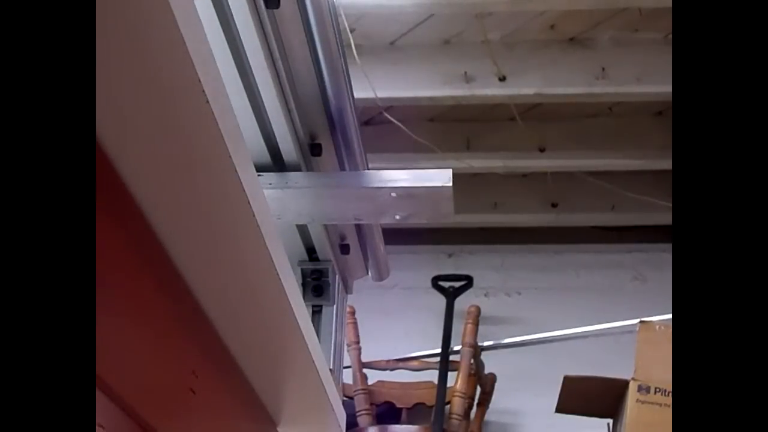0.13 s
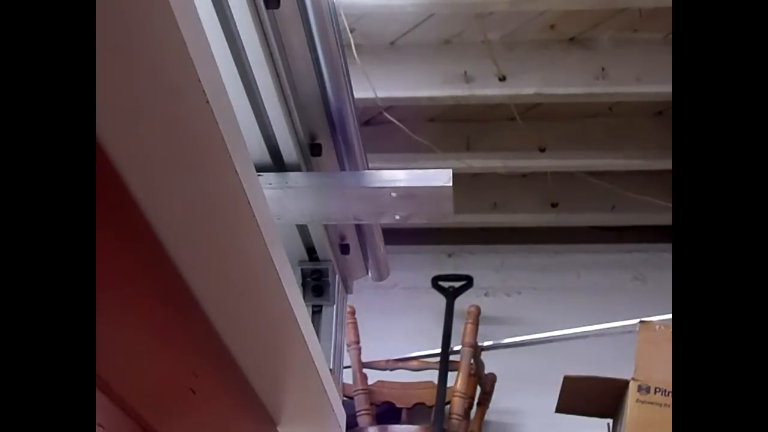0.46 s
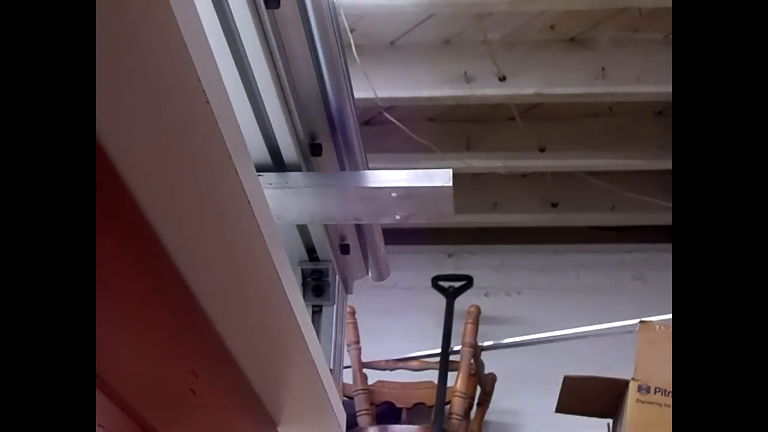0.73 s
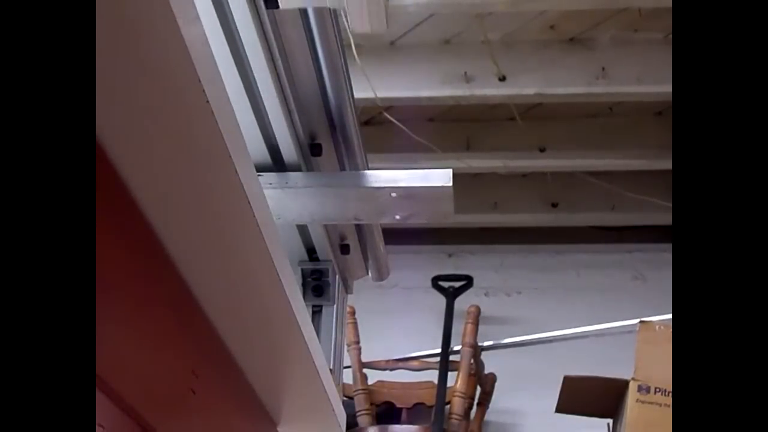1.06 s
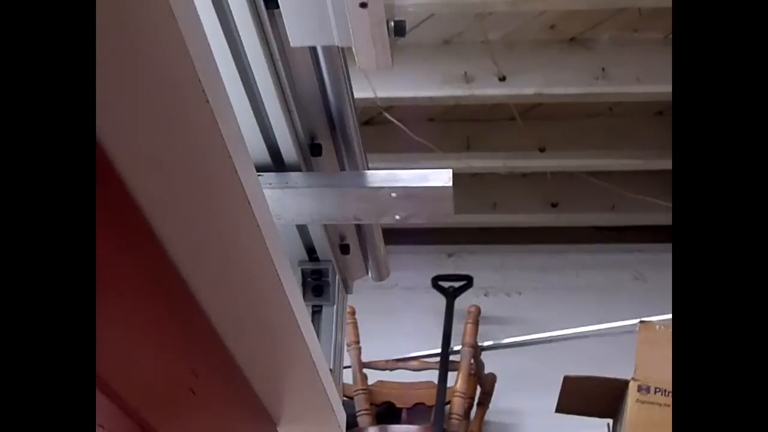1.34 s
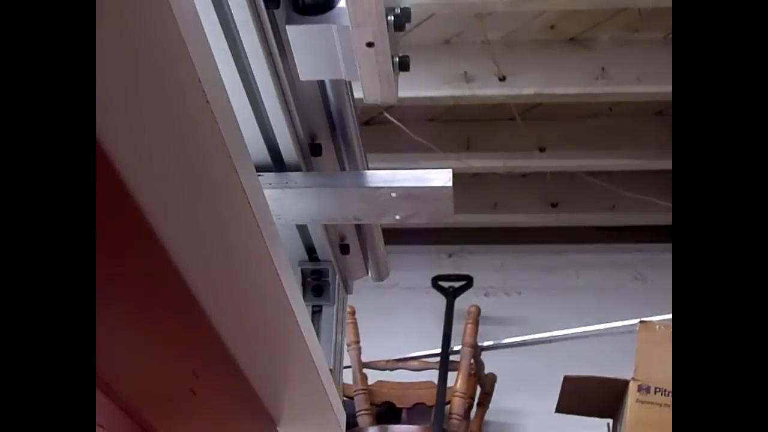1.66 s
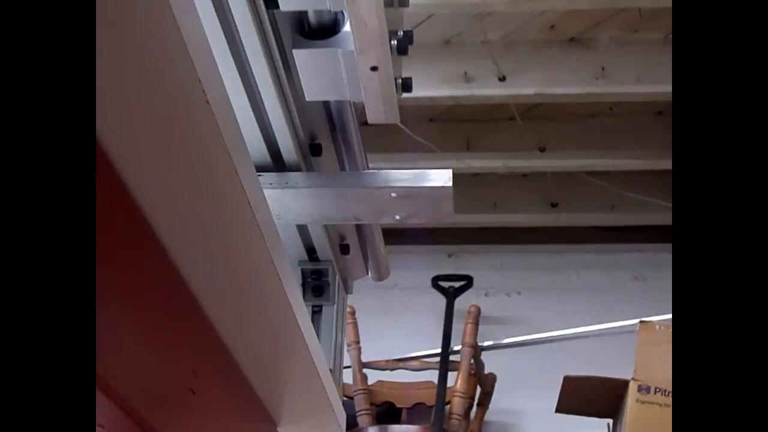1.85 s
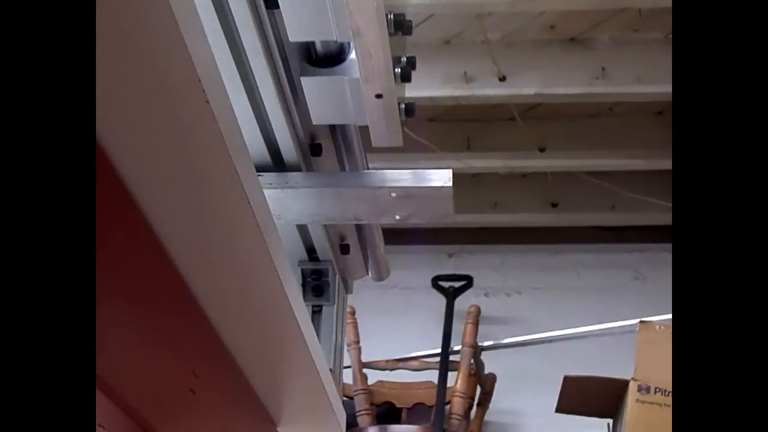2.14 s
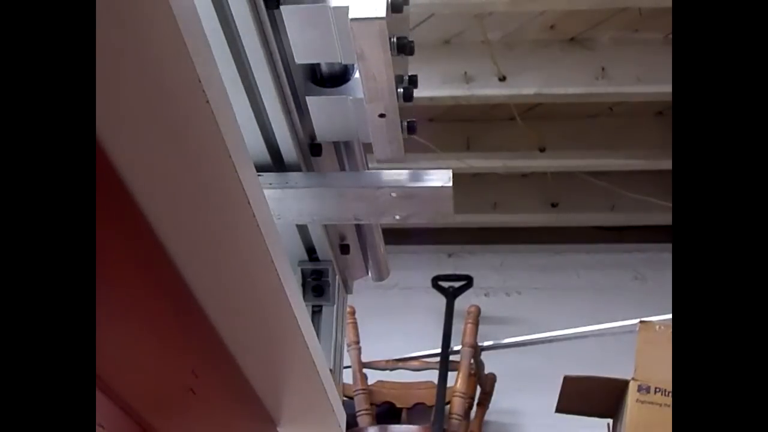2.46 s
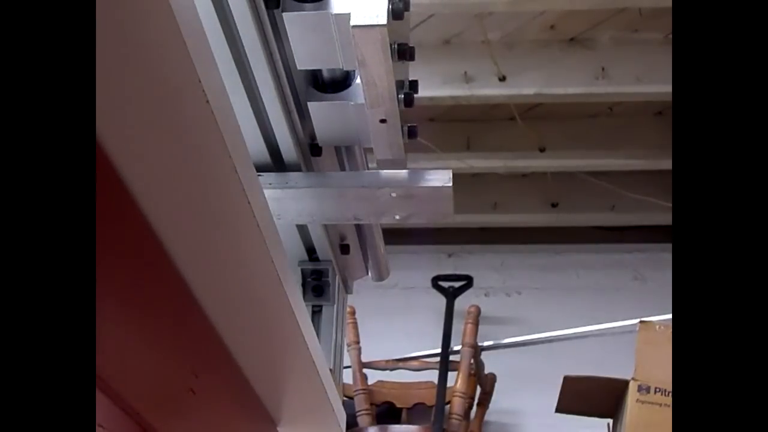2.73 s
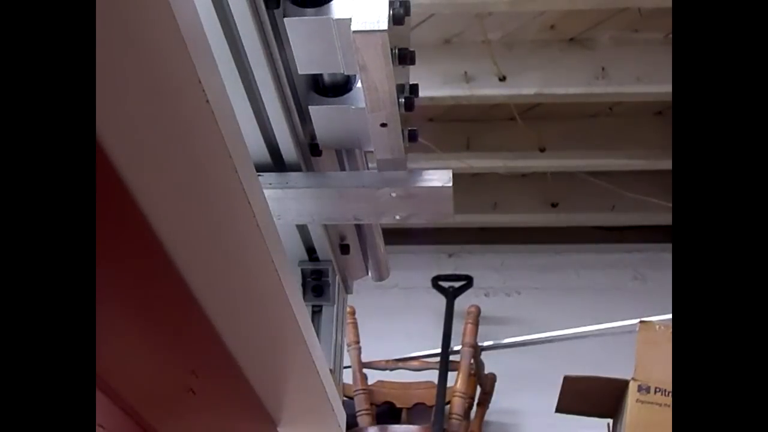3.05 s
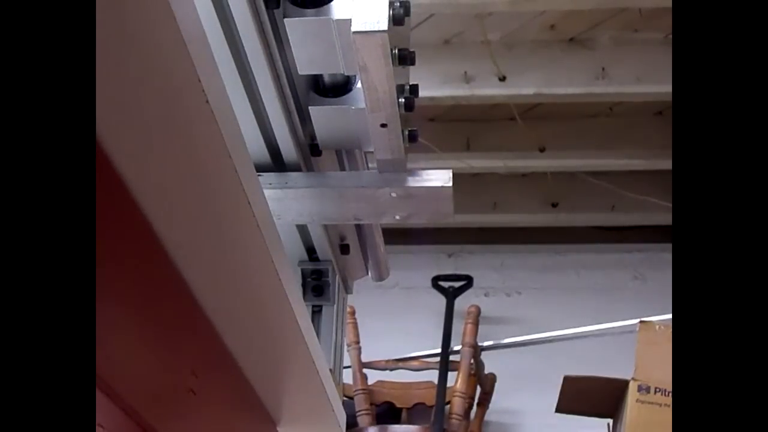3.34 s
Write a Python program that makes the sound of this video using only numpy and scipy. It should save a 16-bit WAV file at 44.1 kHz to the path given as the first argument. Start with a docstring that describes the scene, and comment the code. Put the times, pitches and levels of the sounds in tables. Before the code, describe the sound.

A ball-bearing carriage starts along a steel rail with a brief scrape, then rumbles, hisses and ticks over a low drone. From about 0.8 seconds it slows and grows quieter, stopping with a small rub at 2.5 seconds and a knock just after. A dull bump comes near 3.1 seconds, then loose, ringing metal clatters ever louder until about 3.5 seconds, with short workshop reflections.

```python
"""Carriage on a steel rail

In a workshop, at one microphone, a carriage on ball-bearing blocks rolls along a rail, fast, then slowly.
The balls rumble, hiss and tick and the long frame drones; the carriage rubs and knocks as it stops.
A dull bump follows, then a growing clatter of loose, ringing metal, with short reflections off the room."""
import sys
import numpy as np
from scipy import signal
from scipy.fft import rfft, irfft
from scipy.io import wavfile

SR = 44100
rng = np.random.default_rng(int(sys.argv[2]) if len(sys.argv) > 2 else 0)


def to_wav(sig):
    """Store sig (one row per channel, or 1-D mono) as 16-bit WAV at the path in sys.argv[1].

    Samples outside -1..1 are clipped; the rate is SR.
    """
    pcm = np.clip(np.atleast_2d(sig), -1, 1) * 32767
    pcm = np.round(pcm).astype(np.int16)
    wavfile.write(sys.argv[1], SR, pcm.T)  # frames by channels


N = 154350
STOP_S = 2.49  # the carriage comes to rest

# Rolling as it reaches the microphone, falling with speed: (time [s], rumble level [dB], hiss level [dB])
ROLL_LEVELS = [(0, -25.5, -33.5), (.25, -25.5, -32), (.46, -22, -30), (.69, -23.5, -31.5),
               (.86, -30.5, -38.5), (1.03, -36, -42.5), (1.22, -40.5, -45.5), (1.38, -40.5, -44.5),
               (1.66, -49, -49.5), (1.96, -42, -46), (2.2, -49, -46.5), (2.29, -47.5, -47.5),
               (2.48, -55, -51)]


def amp(db):
    """Decibels to gain."""
    return 10 ** (np.asarray(db) / 20)


def unit_rms(x):
    """Scales to rms 1."""
    return x / np.sqrt(np.mean(x ** 2) + 1e-20)


def unit_energy(x):
    """Scales to energy 1."""
    return x / np.sqrt(np.sum(x ** 2) + 1e-20)


def at_hz(points, hz):
    """Reads a table on a log-frequency axis."""
    f, value = np.transpose(points)
    return np.interp(np.log(hz + 1), np.log(f + 1), value)


def curve(points, column=1):
    """Reads one column of a time table at every sample."""
    rows = np.array(points)
    return np.interp(np.arange(N) / SR, rows[:, 0], rows[:, column])


def add(mix, s, sound):
    """Mixes a sound in at s seconds."""
    part = mix[max(round(s * SR), 0):][:len(sound)]
    part += sound[:len(part)]


def colour(x, spectrum, treble_db=0, size=4096, shelf_hz=3540):
    """Minimum-phase filter with the given spectrum and a treble shelf."""
    hz = abs(np.fft.fftfreq(size, 1 / SR))
    shelf = 1 - 1 / (1 + (hz / shelf_hz) ** 4)
    log_gain = np.log(amp(at_hz(spectrum, hz) + treble_db * shelf))
    taps = np.fft.ifft(np.exp(np.conj(signal.hilbert(log_gain)))).real[:size // 2]
    return signal.fftconvolve(x, taps)[:len(x)]


def drift(rate_hz):
    """Smooth random motion of rms 1."""
    hz = np.fft.rfftfreq(N, 1 / SR)
    lowpass = np.exp(-(hz / rate_hz) ** 2) * (hz > 0)
    return unit_rms(irfft(rfft(rng.standard_normal(N)) * lowpass, N))


def noise_band(hz, width_hz, samples=N):
    """Noise passed twice through one resonance."""
    r = np.exp(-np.pi * width_hz / SR)
    x = rng.standard_normal(samples)
    for _ in range(2):
        x = signal.lfilter([1 - r], [1, -r * np.exp(2j * np.pi * hz / SR)], x).real
    return x


def wavering_tone(hz, wander_hz, wander_rate_hz, flutter_db, flutter_rate_hz):
    """A sine whose pitch and level waver at random."""
    turns = np.cumsum(hz + wander_hz * drift(wander_rate_hz)) / SR
    return unit_rms(np.sin(2 * np.pi * turns) * amp(flutter_db * drift(flutter_rate_hz)))


def grains(per_s, spread_db):
    """Random tiny impacts of uneven size."""
    size = amp(spread_db * np.minimum(rng.exponential(1, N), 5))
    return size * rng.choice([-1, 1], N) * (rng.random(N) < per_s / SR)


def room_tail(size=256):
    """Diffuse reflections off the workshop walls, each band dying at its own speed."""
    # Decay of the room: (frequency [Hz], t60 [s])
    decay = [(200, 0.25), (1000, 0.3), (4500, 0.39), (14000, 0.17)]
    hz, t, bands = signal.stft(rng.standard_normal(SR // 2), SR, nperseg=size)
    bands = bands * amp(-60 * t / at_hz(decay, hz)[:, None])
    return unit_energy(signal.istft(bands, SR, nperseg=size)[1][:SR // 2])


def dense_ring(t60_s, samples):
    """Modes too close to tell apart: dying noise."""
    t = np.arange(samples) / SR
    return unit_energy(rng.standard_normal(samples) * amp(-60 * t / t60_s))


def blow(spectrum, treble_db, crack_s, room_db):
    """A short crack and its reflections in the room."""
    t = np.arange(SR // 2) / SR
    crack = unit_energy(rng.standard_normal(len(t)) * np.exp(-t / crack_s))
    heard = colour(crack + amp(room_db) * room_tail(), spectrum, treble_db)
    return unit_energy(heard) * np.sqrt(SR / 100 * (1 + amp(2 * room_db)))


def ring(modes, uneven_db=1.5):
    """Dying modes, struck a little differently each time."""
    out, t = np.zeros(SR // 2), np.arange(SR // 2) / SR
    for hz, db, t60 in modes:
        envelope = amp(db + uneven_db * rng.standard_normal() - 60 * t / t60)
        out += envelope * np.sin(2 * np.pi * (hz * t + rng.random()))
    return unit_energy(out) * np.sqrt(SR / 100)


def along_rail(x, count=12, places_per_s=30):
    """The rail rings differently at each place: its response is cross-faded along the run."""
    place = np.arange(N) / SR * places_per_s
    out = np.zeros(N)
    for k in range(count):
        nearness = np.clip(1 - abs((place - k + 1) % count - 1), 0, 1)
        out += signal.fftconvolve(x * np.sqrt(nearness), dense_ring(t60_s=0.17, samples=SR // 4))[:N]
    return out


def steel_ring(x, ring_db=-2):
    """The steel's many close modes prolong the treble of what excites it."""
    treble = signal.sosfiltfilt(signal.butter(2, 2200, "high", fs=SR, output="sos"), x)
    ringing = signal.fftconvolve(treble, dense_ring(t60_s=.3, samples=SR // 2))[:N]
    return x - treble + (treble + amp(ring_db) * ringing) / np.sqrt(1 + amp(2 * ring_db))


def ball_rumble(fast):
    """Thousands of ball contacts a second shake the rail."""
    # Rumble at speed: (frequency [Hz], level [dB])
    at_speed = [(90, -18), (150, -4), (210, 2.5), (280, -5.5), (340, 2), (580, -4.5), (900, -0.5),
                (1700, 0), (2400, -4.5), (3000, -19.5), (5000, -32)]
    # Rumble at a creep: (frequency [Hz], level [dB])
    at_creep = [(90, -26), (210, -3.5), (270, -6.5), (420, -0.5), (800, -10.5), (1200, -3), (1480, -13),
                (2100, -7), (2900, -15.5), (5000, -31.5)]
    contacts = grains(per_s=5000, spread_db=3)
    shake = contacts + amp(-2) * along_rail(contacts)
    quick, slow = unit_rms(colour(shake, at_speed)), unit_rms(colour(shake, at_creep))
    return unit_rms(fast * quick + (1 - fast) * slow)


def rail_hum():
    """The shaken rail hums in its resonances."""
    # Resonances of the rail: (frequency [Hz], half-width [Hz], level [dB])
    modes = [(330.4, 13.4, 4), (401, 31, -0.5), (463.5, 23, 4), (555, 27, 0), (563.7, 31, 5),
             (652, 27, 4.5), (705, 59, -1), (1260, 190, -4.5)]
    return unit_rms(sum(amp(db) * unit_rms(noise_band(hz, 2 * half)) for hz, half, db in modes))


def ball_hiss(fast):
    """The finest ball contacts merge into a gritty hiss."""
    # Hiss at speed: (frequency [Hz], level [dB])
    at_speed = [(1500, -8), (2800, 1), (4400, 0.5), (6500, -6), (14000, -12)]
    # Hiss at a creep: (frequency [Hz], level [dB])
    at_creep = [(1500, 8), (2800, -1.5), (5000, -2), (7200, -17), (9000, -2.5), (11000, -13), (14000, -16)]
    grit = grains(per_s=12000, spread_db=1) * amp(drift(rate_hz=440))
    return fast * unit_rms(colour(grit, at_speed)) + (1 - fast) * unit_rms(colour(grit, at_creep))


def rolling(slow_db=-43, fast_db=-33, judder_db=0.5, stop_db_per_s=83):
    """Rumble, hum and hiss follow the speed; at a creep the bearing block sings on its own resonance."""
    since_stop = np.maximum(np.arange(N) / SR - STOP_S, 0)
    motion_db = judder_db * drift(rate_hz=55) - stop_db_per_s * since_stop
    rumble_db, hiss_db = curve(ROLL_LEVELS, column=1), curve(ROLL_LEVELS, column=2)
    fast = np.clip((rumble_db - slow_db) / (fast_db - slow_db), 0, 1)  # 0 creeping, 1 at speed
    body = amp(-1) * ball_rumble(fast) + amp(-6) * rail_hum()
    block = wavering_tone(1718, wander_hz=22, wander_rate_hz=60, flutter_db=2.2, flutter_rate_hz=60)
    body += amp(-8.5 - (rumble_db - slow_db) / 2) * (1 - fast) * block
    return amp(rumble_db + motion_db) * body + amp(hiss_db + motion_db) * ball_hiss(fast)


def shudders():
    """The frame shakes deeply and briefly as the carriage is pushed off."""
    # Shakes of the frame: (time [s], length [s], level [dB])
    shakes = [(0, .13, -38.5), (0.257, 0.18, -42)]
    out = np.zeros(N)
    for s, length, db in shakes:
        low = noise_band(hz=48, width_hz=45, samples=SR)[-int(length * SR):]
        add(out, s, amp(db) * unit_rms(low) * signal.windows.tukey(len(low), .2))
    return out


def frame_drone():
    """The two lowest bending modes of the frame swell and fade while the carriage moves."""
    # Swell of the lowest mode: (time [s], level [dB])
    lower = [(.15, -42.5), (.28, -38), (.39, -31), (.5, -37.5), (.63, -39), (.71, -28.5), (.78, -48),
             (.83, -33.5), (.89, -48), (.94, -36.5), (1.04, -44), (1.1, -31.5), (1.15, -33), (1.24, -44.5),
             (1.31, -31.5), (1.41, -36), (1.46, -46.5), (1.79, -47), (1.95, -33.5), (2.05, -33),
             (2.12, -43.5), (2.18, -36.5), (2.23, -45), (2.3, -36.5), (2.36, -37), (2.41, -48), (2.55, -60)]
    # Swell of the second mode: (time [s], level [dB])
    upper = [(.3, -51), (.53, -38.5), (.73, -51), (1.1, -47), (1.36, -40.5), (1.56, -52), (1.77, -42.5),
             (2.1, -51), (2.6, -56)]
    out = np.zeros(N)
    for hz, swell in (118.4, lower), (185.2, upper):
        tone = wavering_tone(hz, wander_hz=3, wander_rate_hz=12, flutter_db=1.6, flutter_rate_hz=48)
        out += amp(curve(swell) - 1) * tone
    return out


def room_tone(level_db=-43):
    """The workshop's low rumble and the microphone's steady hiss."""
    # Still air and hiss: (frequency [Hz], level [dB])
    spectrum = [(90, -3.5), (480, -16.5), (3000, -27.5), (14000, -32)]
    return amp(level_db) * unit_rms(colour(rng.standard_normal(N), spectrum, size=16384))


def scrapes(ping_db=-13, room_db=-3):
    """The carriage rubs briefly as it starts and as it stops, and leaves the steel ringing."""
    # Rubs of the carriage: (time [s], length [s], level [dB], treble [dB])
    rubs = [(0.038, 0.069, -29, 5), (2.507, 0.025, -36, -2.5)]
    # Colour of a rub: (frequency [Hz], level [dB])
    spectrum = [(60, -49), (300, 5), (800, 3), (3000, 1), (14000, -3.5)]
    # Pings of the steel: (frequency [Hz], level [dB], t60 [s])
    modes = [(1700, 0, .1), (3050, 3, .07), (3601, -9, .15)]
    out = np.zeros(N)
    for s, length, db, treble_db in rubs:
        grit = unit_rms(colour(grains(per_s=3900, spread_db=1), spectrum, treble_db))
        swell = signal.windows.tukey(int(length * SR), .8)
        add(out, s, amp(db) * grit[:len(swell)] * swell)
    tail = amp(room_db) * room_tail() + amp(ping_db) * unit_energy(ring(modes))
    return out + signal.fftconvolve(out, tail)[:N]


def ball_ticks(gain_db=-4, faint_per_s=40):
    """Single balls click into the return channel; fainter clicks between them follow the speed."""
    # Distinct clicks: (time [s], level [dB])
    clicks = [(.395, -26), (0.432, -31), (.459, -27.5), (.490, -25.5), (0.554, -33), (0.698, -34),
              (.817, -35), (1.09, -36.5), (1.187, -42), (1.212, -38), (1.236, -46), (1.312, -40),
              (1.42, -42.5), (1.527, -40.5), (1.558, -39.5), (1.624, -42), (1.704, -41.5), (1.830, -41.5),
              (1.955, -40), (2.022, -43), (2.104, -39.5), (2.243, -42.5)]
    # Colour of a click: (frequency [Hz], level [dB])
    spectrum = [(500, -26), (2500, -7.5), (4800, 5.5), (7000, 0.5), (9500, -2.5), (14000, -1.5)]
    out, hiss_db = np.zeros(N), curve(ROLL_LEVELS, column=2)
    draws = rng.random((int(faint_per_s * STOP_S), 2)) * (STOP_S, 1)
    faint = [(s, hiss_db[int(s * SR)] + 2 - 8 * softness) for s, softness in draws]
    shapes = [blow(spectrum, 0, crack_s=0.0019, room_db=-0.5) for _ in range(12)]
    for k, (s, db) in enumerate(list(clicks) + faint):
        add(out, s, amp(db + gain_db) * shapes[k % len(shapes)])
    return out


def knocks(gain_db=-4.5, ring_db=-6):
    """The carriage knocks as it stops, and the frame rings."""
    # Knocks of the carriage: (time [s], level [dB], treble [dB])
    hits = [(2.6386, -27.5, -7), (2.648, -32.5, 33)]
    # Colour of a knock: (frequency [Hz], level [dB])
    spectrum = [(120, -19), (400, 2), (600, -7), (780, 0), (1300, -3.5), (2000, -6.5), (3300, -9.5),
                (5900, -7.5), (7500, -16), (14000, -18)]
    # Modes of the frame: (frequency [Hz], level [dB], t60 [s])
    modes = [(496, -8, 0.24), (785, 4, .13), (1056, -6, 0.26), (1924, 3, 0.15)]
    out = np.zeros(N)
    for s, db, treble_db in hits:
        crack = blow(spectrum, treble_db, crack_s=0.015, room_db=1.5)
        add(out, s, amp(db + gain_db) * (crack + amp(ring_db) * ring(modes)))
    return out


def bump(gain_db=-6, attack_s=0.0021):
    """Blows in quick succession merge into one dull, hollow bump."""
    # Blows of the bump: (time [s], level [dB])
    hits = [(3.05, -28), (3.06, -23), (3.09, -31)]
    # Colour of a blow: (frequency [Hz], level [dB])
    spectrum = [(100, -6), (600, -5), (950, 5), (1300, 0), (1550, -9), (1950, -2), (2600, -6.5),
                (3200, -19), (5000, -29), (14000, -50)]
    # Modes of the bumped part: (frequency [Hz], level [dB], t60 [s])
    modes = [(590, -7.5, 0.29), (875, -10, 0.18), (1279, 4.5, 0.15), (1913, 1, 0.15), (2630, -1, 0.094)]
    out = np.zeros(N)
    onset = np.minimum(np.arange(SR // 2) / SR / attack_s, 1)
    for s, db in hits:
        thud = blow(spectrum, 0, crack_s=0.017, room_db=-0.5)
        add(out, s, amp(db + gain_db) * onset * (thud + ring(modes)))
    return out


def clatter(gain_db=-4, ring_t60_s=.36, chatter_db=-2, chatter_s=0.035, attack_s=0.0015):
    """Loose metal parts strike each other ever harder, ring on, and chatter after each blow."""
    # Clashes of the parts: (time [s], level [dB], treble [dB])
    hits = [(3.149, -30.5, 2), (3.179, -31.5, -11), (3.2117, -26, 1), (3.232, -23, -8), (3.267, -23, -6),
            (3.284, -22.5, -5), (3.2923, -21, -2), (3.321, -21, -5), (3.3525, -16.5, -4),
            (3.3765, -13, 2.5), (3.385, -17, 9), (3.4097, -12, 5), (3.424, -16, -7), (3.436, -21, 1),
            (3.475, -15.5, -0.5), (3.49, -14, 21)]
    # Colour of a clash: (frequency [Hz], level [dB])
    spectrum = [(100, -13.5), (400, -6), (540, 3.5), (750, 3), (1200, -1), (1700, 2), (3000, -1.5),
                (5500, 0), (6850, -3), (7800, -2), (9000, -5), (12000, -6), (14000, -4)]
    # Modes of the metal: (frequency [Hz], level [dB])
    partials = [(538, -2), (1346, -4), (1680, -4), (1892, 3), (2084, -3), (2288, -4), (2517, -5),
                (2611, -6), (3683, -6), (5808, -5), (6267, -6), (6494, -7), (9460, -12), (10159, -11)]
    modes = [(hz, db, ring_t60_s) for hz, db in partials]
    out, t = np.zeros(N), np.arange(SR // 2) / SR
    for s, db, treble_db in hits:
        contacts = grains(per_s=700, spread_db=2)[:len(t)]
        bounces = unit_rms(colour(contacts, spectrum, treble_db)) * np.exp(-t / chatter_s)
        chatter = bounces + signal.fftconvolve(bounces, room_tail())[:len(t)]
        crack = blow(spectrum, treble_db, crack_s=0.015, room_db=6)
        clash = (crack + ring(modes) + amp(chatter_db) * chatter) * np.minimum(t / attack_s, 1)
        # The top edge opens as the clatter grows louder: quiet clashes sound duller, loud ones brighter.
        edge_hz = min(10400 * 2 ** ((db + 20) / 29), SR / 2 - 1000)
        lowpass = signal.butter(4, edge_hz, fs=SR, output="sos")
        add(out, s, amp(db + gain_db) * signal.sosfilt(lowpass, clash))
    return out


def scene():
    """All sources in the workshop, at one microphone."""
    steel = steel_ring(rolling() + clatter())
    mix = steel + frame_drone() + shudders() + ball_ticks() + scrapes() + knocks() + bump() + room_tone()
    return mix[None]


def record(dry):
    """The recorder passes sound up to about 14 kHz."""
    lowpass = signal.firwin(511, 14050, window=("kaiser", 9), fs=SR)
    return signal.oaconvolve(dry, lowpass[None], "same")


dry = scene()
out = record(dry)
to_wav(out)
```